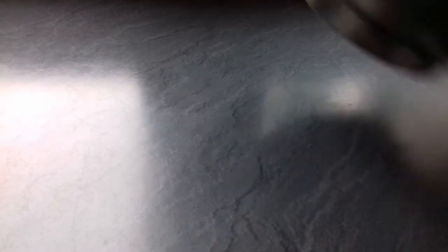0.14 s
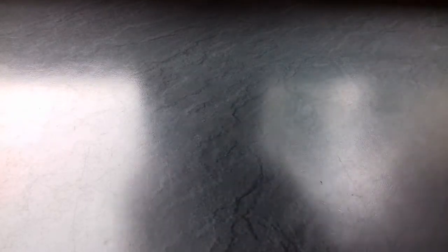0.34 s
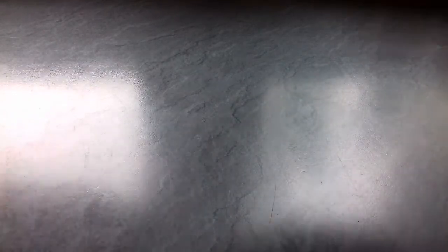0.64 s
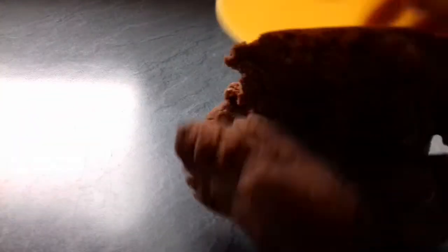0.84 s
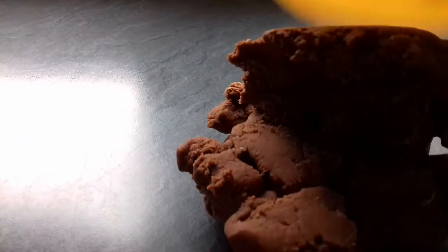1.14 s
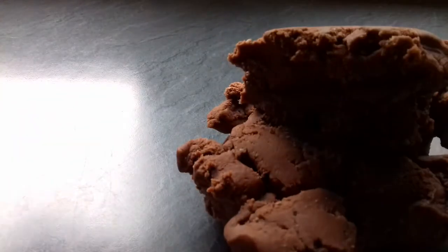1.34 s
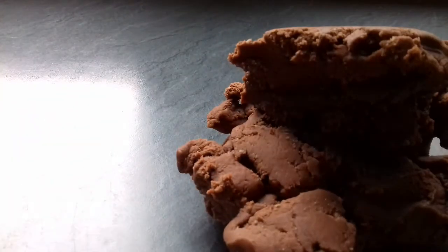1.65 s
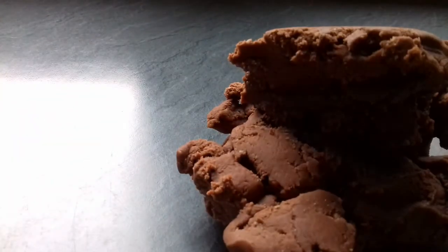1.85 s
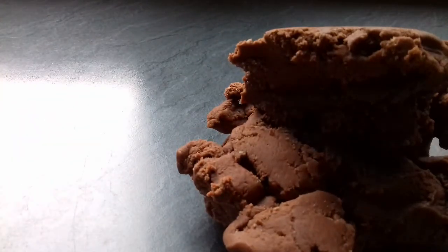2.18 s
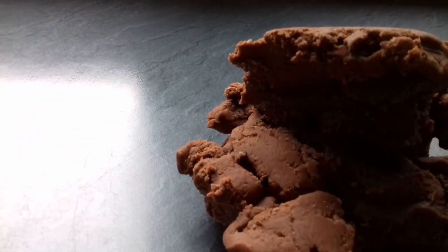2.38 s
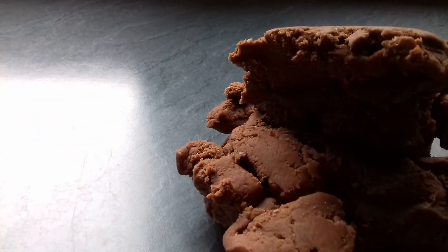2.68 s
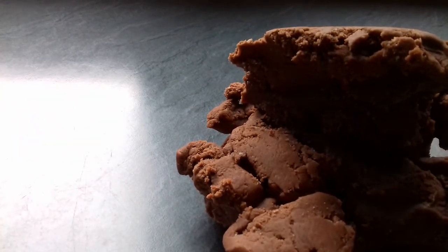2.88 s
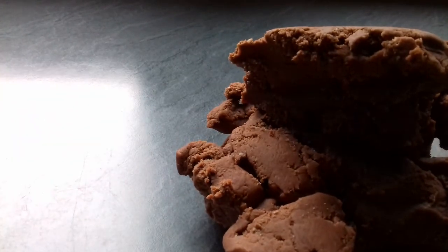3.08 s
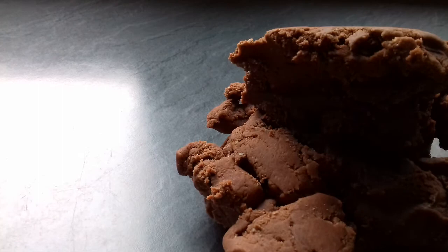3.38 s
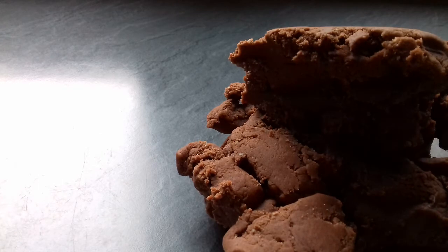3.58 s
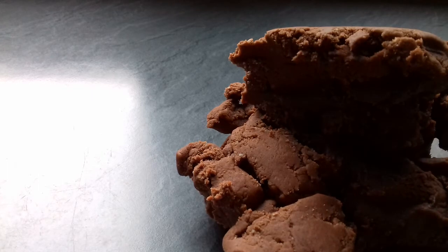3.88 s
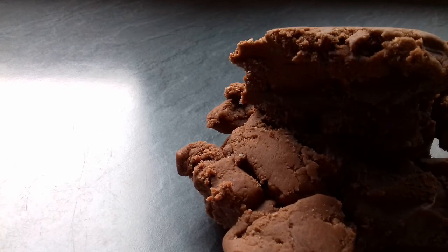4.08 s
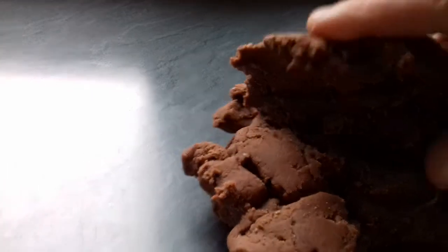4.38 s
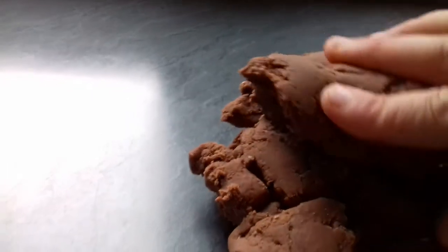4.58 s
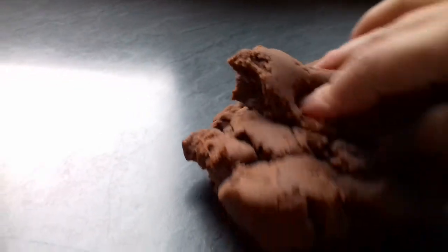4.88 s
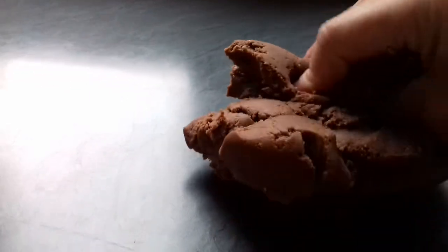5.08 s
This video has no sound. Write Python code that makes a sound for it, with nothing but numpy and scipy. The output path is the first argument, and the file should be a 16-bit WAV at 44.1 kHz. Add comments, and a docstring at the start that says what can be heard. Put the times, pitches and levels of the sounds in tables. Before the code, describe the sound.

Close, slightly thin pickup over a stone countertop in a lively kitchen: a heavy bowl slam at once, a dull dough plop, a cluster of ringing steel clanks with brief scrapes, a pause, the bowl set down with a hollow knock and two weaker bounces, faint dough handling, and one soft low bump. Room echo about half a second, quiet hiss beneath.

```python
"""In a small kitchen, a steel mixer bowl is knocked out over a stone countertop.
The dough drops with a soft plop, the bowl clanks and rubs as it is handled, is set down with two bounces,
and a last dull bump follows. Blows are clicks with chatter, damped thuds and ringing steel modes; rubs are
grainy noise. The room answers each blow with scattered echoes, over a faint steady hum and hiss."""
import sys
import numpy as np
from scipy import signal
from scipy.fft import rfft, irfft, next_fast_len
from scipy.io import wavfile
from scipy.ndimage import uniform_filter1d

SR = 44100
rng = np.random.default_rng(int(sys.argv[2]) if len(sys.argv) > 2 else 0)


def generate_wav(signal):
    """Clip the signal to [-1, 1] and save it as 16-bit WAV at the path in sys.argv[1]."""
    frames = np.transpose(np.atleast_2d(signal))
    scaled = np.clip(frames, -1, 1) * 32767
    pcm = np.round(scaled).astype(np.int16)
    wavfile.write(sys.argv[1], SR, pcm)


N = 230836  # length of the scene in samples

# Room air, only its colour: pitch_hz, relative_level_db
AIR_COLOUR = [(25, -7.5), (55, -16.5), (100, -7.5), (160, -6.5), (300, -5), (600, -11), (900, -15),
              (2000, -18), (3900, -17.5), (5200, -45.5), (9000, -43.5), (15000, -46.5)]
# Humming resonances in the background: pitch_hz, width_hz, rms_level_db
HUM_RESONANCES = [(319.3, 7.5, -75), (408, 10, -77.5), (565, 10, -80)]
# Hiss of each channel, only its colour: pitch_hz, relative_level_db
HISS_COLOUR = [(25, 19), (120, 12.5), (300, 9.5), (700, 17.5), (5000, 3), (9300, -1), (10000, -12.5),
               (10800, 0), (14400, 0.5), (15100, -8.5), (15600, -1)]
AIR_DB, HISS_DB = -65.5, -69  # rms levels

# Colour of the kitchen's dense echo: pitch_hz, relative_level_db
ROOM_COLOUR = [(60, -8.5), (200, 2.5), (470, 1), (1000, -2), (2000, 3), (4500, -1.5), (9000, 5.5)]
# Time the dense echo takes to fall 60 dB: pitch_hz, t60_s
ROOM_DECAY = [(100, .45), (300, 0.4), (700, 0.49), (1800, 0.54), (4800, 0.59), (10000, .5)]
# First echoes off the nearest walls and cupboards: delay_s, level_db
WALL_ECHOES = [(0.019, -17.5), (.034, -11.5), (0.07, -17.5)]

# Rubs: middle_s, material, spread_s, peak_envelope_level_db
RUBS = [ (0.015, "steel", 0.023, -60), (0.255, "steel", .023, -58), (0.763, "dough", 0.0021, -48.5),
        (0.824, "dough", 0.025, -54.5), (1.36, "steel", 0.02, -74), (1.625, "steel", .03, -55),
        (2.216, "steel", .046, -62), (2.34, "steel", .017, -58.5), (2.53, "steel", .098, -69.5),
        (3.525, "dough", 0.032, -62.5), (4.098, "dough", 0.055, -69), (4.445, "dough", .05, -55.5),
        (4.80, "dough", .03, -68.5), ]
# Broad resonance of each rubbing material: material: centre_hz, width_hz, top_hz
FRICTION = {"steel": (4460, 450, 5050), "dough": (2830, 4400, 4160)}

# Lumps of dough landing, the smaller with a higher thud: start_s, level_db, thud_hz, thud_level_db
LUMPS = [(0.7827, -1, 99.5, -30.5), (1.1482, -13.5, 309, -41)]
LUMP_TILT_DB_PER_OCTAVE, LUMP_CHATTER_DB = 1, -1
LUMP_THUD_CYCLES = 14.7  # swings until the thud has fallen 60 dB
# The dough snaps free just before it falls
SNAP_S, SNAP_DB, SNAP_TILT_DB_PER_OCTAVE, SNAP_CHATTER_DB = 0.7647, 0, -1.7, -6.5

# Colour of each kind of contact: contact: list of pitch_hz, relative_level_db
CONTACT_COLOURS = { "slam": [(50, -13.5), (95, 22.5), (150, 22), (420, 26.5), (520, 13.5), (880, 6),
                   (1080, 12.5), (1300, 1), (2400, -8), (3500, 3), (4700, 5.5), (5900, -12.5),
                   (8000, -13.5), (10000, -33.5)], "clank": [(60, -20), (200, 0), (600, -7.5), (850, 7),
                   (1150, 19.5), (1650, 5.5), (2400, -6.5), (3700, -1.5), (5000, -19.5), (8000, -32.5),
                   (10500, -39.5)], "base": [(45, -6.5), (140, 17.5), (230, 14), (430, 23.5), (700, 19.5),
                   (1200, 5.5), (1900, 0), (2700, -4.5), (4000, -2.5), (5500, -23), (8000, -36.5),
                   (12000, -38.5)], "tap": [(70, -17.5), (200, -10.5), (450, 2), (700, -19.5), (1100, -2.5),
                   (2500, -16.5), (4300, -10), (5400, -27), (7400, -26), (10000, -51)],
                   "dough": [(40, -17.5), (95, 10.5), (200, 9.5), (400, 1.5), (800, -16.5), (1300, -8),
                   (2200, -23), (4200, -21.5), (6000, -48.5)], "crack": [(80, -28), (350, -9.5),
                   (900, -7.5), (1600, 0), (3400, -5), (5000, -30.5), (9000, -49)], "bump": [(45, -27.5),
                   (88, 2.5), (210, -4), (450, 3.5), (900, -3.5), (1600, -13.5), (3800, -19.5), (5200, -41),
                   (9000, -77)], }
# What all contacts of one kind share: contact: chatter_t60_s, sent_to_room_db
CONTACT_FEEL = { "slam": (0.056, -7.5), "clank": (0.065, -2), "base": (.055, -4), "tap": (0.06, -3),
                "bump": (.5, -.5), "dough": (.05, -5), "crack": (0.037, -15), }
# Blows on the bowl: start_s, contact, level_db, tilt_db_per_octave, chatter_db, bowl_ring_db
BLOWS = [ (0.001, "tap", -26, 8.5, 4, -8), (0.0473, "slam", -.5, -.3, 4.5, -1.5),
         (0.0567, "slam", -10, 0.3, 3.5, -16), (0.149, "tap", -10, 3, 8.5, -47),
         (1.5378, "crack", -3, -5.5, 1, -36), (1.6540, "clank", 3, -1.3, -5, -.5),
         (1.756, "tap", -10, 0.5, 8, -12), (1.8737, "tap", 1.5, 0, 4, -5.5),
         (1.9534, "tap", -3, -0.5, 1, -16), (2.0012, "tap", -2, 0.7, 10, -2),
         (3.0990, "base", -1.5, -.1, -1, -.5), (3.1792, "base", -13.5, 0.4, 6.5, -22),
         (3.2903, "base", -14.5, -1.2, -9, -46), (4.3746, "bump", 0, -.6, 5, -50), ]
# Thud of bowl and counter, relative to the blow: contact: list of pitch_hz, t60_s, relative_level_db
THUDS = { "slam": [(133, 0.086, -21), (217.8, .06, -9), (305, .07, -17)], "clank": [(1150, .0038, -24)],
         "base": [(163, .09, -24), (492, 0.042, 0)], "tap": [(460, 0.11, -39)], "crack": [(336, .1, -45)],
         "bump": [(88, .3, -45), (450, .05, -41)], }
# Where each contact meets the bowl: contact: place (0 wall, 1 rim, 2 foot, 3 side)
STRUCK_AT = {"slam": 0, "clank": 1, "base": 2, "tap": 3, "crack": 0, "bump": 2}
# The bowl's modes, strong or weak by the place struck:
# pitch_hz: t60_s, wall_level_db, rim_level_db, foot_level_db, side_level_db
BOWL_MODES = { 586: (0.6, -30, -47, -41.5, -62), 684: (.5, -54, -60.5, -35.5, -65),
              775: (0.64, -51, -57, -41, -61.5), 993: (0.8, -58.5, -32, -49.5, -52),
              1033: (.8, -43, -41, -46, -48), 1040: (.35, -44, -44, -52, -54),
              1065: (1.13, -57.5, -47.5, -52, -48), 1116: (.24, -60, -45, -58, -44),
              1280: (0.93, -67, -37.5, -55, -59), 1543: (0.33, -52, -31.5, -61.5, -54),
              1637: (0.8, -60, -29, -56.5, -65), 1705: (0.0245, -56.5, -48, -21, -58),
              1816: (.35, -66, -58, -31, -68), 1849: (0.33, -59, -50.5, -35.5, -63),
              2203: (.26, -66, -66, -31, -64), 2290: (.08, -58, -56, -33, -56),
              2735: (.12, -33, -58, -50, -62), 2800: (.4, -52, -62, -49, -66),
              3131: (.42, -36, -54, -43, -56), 3344: (.9, -56, -51, -50, -48),
              3359: (.26, -31, -46, -46, -53), 3418: (.13, -23, -50, -56, -62),
              3596: (.09, -22, -46, -56, -62), 3735: (0.02, -31, -52, -54, -63),
              3955: (.36, -49, -57, -42, -64), 4204: (.22, -54, -66, -53, -62),
              4340: (0.4, -50, -66.5, -62, -49.5), 4425: (.42, -42.5, -71, -63, -58),
              4510: (.13, -45, -66, -48, -54), 4657: (0.37, -46, -68.5, -57.5, -65),
              5120: (.08, -37, -74, -57, -70), 5782: (0.5, -67, -54, -76.5, -73), }
STIFFEN_OCT_PER_DB = .01  # a harder blow meets a stiffer contact and thuds higher
THUD_ROOM_DB = -10  # share of each bowl thud that reaches the room
WAVER_DB, WAVER_PER_S = 2.5, 11  # the bowl turns in the hand, so each mode swells and fades on its own

CHATTER_CLUMP_DB, ECHO_CLUMP_DB = 2, 1  # unevenness of the random arrivals
CUTOFF_HZ = 15720
SIZE = 8192  # samples in one touch or thud
AGE = np.arange(SIZE) / SR  # seconds
ECHO_AGE = np.arange(32768) / SR  # seconds


def from_db(db):
    """Turn decibels into a gain."""
    return 10 ** (np.asarray(db) / 20)


def rms_one(x):
    """Scale to an rms (average strength) of 1."""
    return x / np.sqrt(np.mean(x ** 2) + 1e-20)


def bins(size):
    """Frequencies of a spectrum in Hz, none below 1."""
    return np.maximum(np.arange(size // 2 + 1) * SR / size, 1)


def at_hz(points, hz):
    """Read a table between its points, with pitch spaced by octaves."""
    table_hz, value = np.transpose(points)
    return np.interp(np.log(hz), np.log(table_hz), value)


def add(track, sound, start_s):
    """Mix a sound into a track from a given time."""
    start = max(round(start_s * SR), 0)
    track[start:start + len(sound)] += sound[:N - start]


def dying(t60):
    """Fading envelope that falls 60 dB in t60 seconds."""
    return np.exp(-np.log(1000) * AGE / t60)


def causal(db):
    """Minimum-phase response with these levels: nothing sounds before the touch."""
    cepstrum = irfft(np.log(from_db(db)))
    cepstrum[1:SIZE // 2] *= 2
    cepstrum[SIZE // 2 + 1:] = 0
    return np.exp(rfft(cepstrum))


def noise(gain_at):
    """Steady noise of rms 1, coloured by a gain that depends on frequency."""
    size = next_fast_len(N + N % 2, True)
    spectrum = rfft(rng.standard_normal(size)) * gain_at(bins(size))
    return rms_one(irfft(spectrum, size)[:N])


def resonance(f, hz, width_hz):
    """Gain of one resonance, 1 at its peak."""
    return 1 / np.sqrt(1 + ((f * f - hz * hz) / (f * width_hz)) ** 2)


def scatter(envelope, smooth_hz, clump_db):
    """Random arrivals in small clumps under an envelope, evened to unit power over broad bands."""
    size = len(envelope)
    slow_noise = uniform_filter1d(rng.standard_normal(size), size=150)
    clumps = from_db(clump_db * rms_one(slow_noise))
    arrivals = rng.standard_normal(size) * clumps * envelope
    spectrum = rfft(arrivals, 2 * size)
    smooth_bins = max(int(2 * smooth_hz * size / SR), 1)
    power = uniform_filter1d(np.abs(spectrum) ** 2, smooth_bins)
    return irfft(spectrum / np.sqrt(power))[:size]


def background():
    """Room air with a faint hum, both the same in each channel, and each channel's own hiss."""
    air = from_db(AIR_DB) * noise(lambda f: from_db(at_hz(AIR_COLOUR, f)))
    hum = 0
    for hz, width_hz, db in HUM_RESONANCES:
        hum = hum + from_db(db) * noise(lambda f: resonance(f, hz, width_hz) ** 2)
    hiss = np.array([noise(lambda f: from_db(at_hz(HISS_COLOUR, f))) for channel in range(2)])
    return air + hum + from_db(HISS_DB) * hiss


def kitchen(gap_s=0.0092, diffuse_db=-1.5):
    """Response of the room from one spot: a few wall echoes, and a dense tail that dies band by band."""
    mean_t60 = .5
    build_up = 1 - np.exp(-(ECHO_AGE / gap_s) ** 4)
    envelope = from_db(-60 * ECHO_AGE / mean_t60) * build_up
    size = len(envelope)
    f = bins(2 * size)
    colour = from_db(diffuse_db + at_hz(ROOM_COLOUR, f))
    echoes = rfft(scatter(envelope, 50, ECHO_CLUMP_DB), 2 * size) * colour
    tail = 0
    for hz, t60 in ROOM_DECAY:
        # Overlapping bands, each peaking at its own pitch
        share = at_hz([(other, float(other == hz)) for other, _ in ROOM_DECAY], f)
        band = irfft(echoes * share)[:size]
        # Swap the shared decay for the band's own
        tail = tail + band * np.exp(np.log(1000) * ECHO_AGE * (1 / mean_t60 - 1 / t60))
    for delay_s, db in WALL_ECHOES:
        tail[round(delay_s * SR)] += from_db(db)
    return tail


def rubs(grain_db=3.5):
    """Short strokes of grainy friction, each with one broad resonance."""
    out = np.zeros(N)
    size = len(ECHO_AGE)
    f, middle_s = bins(size), ECHO_AGE.mean()
    for s, material, spread_s, db in RUBS:
        hz, width_hz, top_hz = FRICTION[material]
        slow_noise = uniform_filter1d(rng.standard_normal(size), size=90)
        grains = rms_one(from_db(grain_db * rms_one(slow_noise)))
        colour = resonance(f, hz, width_hz) / np.sqrt(1 + (f / top_hz) ** 20)
        friction = rms_one(irfft(rfft(grains * rng.standard_normal(size)) * colour))
        lead_s = min(s, middle_s)  # a stroke near the start has less room to swell
        stroke = np.exp(-.5 * ((ECHO_AGE - lead_s) / spread_s) ** 2)
        add(out, from_db(db) * stroke * friction, s - lead_s)
    return out


def force_db(db, tilt, hz):
    """Level of a blow at a frequency: a sharp one favours the treble, a soft one the bass."""
    return db + tilt * np.log2(np.maximum(hz, 100) / 1000)


def touch(contact, db, tilt, chatter_db):
    """A click and its brief chatter; the room is fed by the energy of both. Gives (direct, sent to room)."""
    chatter_t60, room_db = CONTACT_FEEL[contact]
    f = bins(SIZE)
    click = irfft(causal(force_db(db, tilt, f) + at_hz(CONTACT_COLOURS[contact], f)))
    arrivals = scatter(dying(chatter_t60), 300, CHATTER_CLUMP_DB)
    chatter = signal.fftconvolve(click, arrivals)[:SIZE]
    chatter_gain = from_db(chatter_db)
    direct = click + chatter_gain * chatter
    sent = from_db(room_db) * np.hypot(1, chatter_gain) * click
    return direct, sent


def thud(hz, t60, rise_s=0.0018):
    """A damped swing that builds up softly, then dies away."""
    build_up = 1 - np.exp(-AGE / rise_s)
    swing = dying(t60) * build_up * np.sin(2 * np.pi * hz * AGE)
    return signal.sosfilt(signal.butter(1, [hz / 2, hz * 2], "band", fs=SR, output="sos"), swing)


def dough(thud_room_db=-12):
    """The dough snaps free of the bowl and plops onto the counter; a crumb follows."""
    direct, to_room = np.zeros(N), np.zeros(N)
    near, sent = touch("crack", SNAP_DB, SNAP_TILT_DB_PER_OCTAVE, SNAP_CHATTER_DB)
    add(direct, near, SNAP_S)
    add(to_room, sent, SNAP_S)
    for s, db, thud_hz, thud_db in LUMPS:
        near, sent = touch("dough", db, LUMP_TILT_DB_PER_OCTAVE, LUMP_CHATTER_DB)
        body = from_db(thud_db) * thud(thud_hz, LUMP_THUD_CYCLES / thud_hz)
        add(direct, near + body, s)
        add(to_room, sent + from_db(thud_room_db) * body, s)
    return direct + signal.oaconvolve(to_room, kitchen())[:N]


def waver():
    """A slow random swell and fade, as a gain."""
    steps = np.arange(N) * WAVER_PER_S / SR
    return np.interp(steps, np.arange(256), from_db(WAVER_DB * rng.standard_normal(size=256)))


def bowl_ring(place, low_hz=450, top_hz=6500):
    """The steel's modes under all the blows at one place; neighbouring modes swing in opposite senses."""
    strikes = np.full(N, 1e-18)  # a tiny constant in place of silence
    for s, contact, *_, ring_db in BLOWS:
        if STRUCK_AT[contact] == place:
            strikes[max(round(s * SR), 0)] += from_db(ring_db)
    out = 0
    for k, (hz, (t60, *place_db)) in enumerate(BOWL_MODES.items()):
        # A two-step feedback filter rings at hz and loses 60 dB in t60
        decay = np.exp(-np.log(1000) / (t60 * SR))
        turn = 2 * np.pi * hz / SR
        strength = (-1) ** k * from_db(place_db[place]) * np.sin(turn)
        feedback = [1, -2 * decay * np.cos(turn), decay * decay]
        mode = signal.lfilter([0, strength], feedback, strikes)
        out = out + waver() * mode
    return signal.sosfilt(signal.butter(2, [low_hz, top_hz], "band", fs=SR, output="sos"), out)


def blows(ring_room_db=-8):
    """Each blow is a touch, a thud that follows its force, and the bowl's ring; each place has its own echo."""
    direct = np.zeros(N)
    to_room = {place: np.zeros(N) for place in sorted(set(STRUCK_AT.values()))}
    for s, contact, db, tilt, chatter_db, _ in BLOWS:
        near, sent = touch(contact, db, tilt, chatter_db)
        stiffer = 2 ** (STIFFEN_OCT_PER_DB * db)
        body = 0
        for hz, t60, thud_db in THUDS[contact]:
            body = body + from_db(force_db(db, tilt, hz) + thud_db) * thud(hz * stiffer, t60)
        add(direct, near + body, s)
        add(to_room[STRUCK_AT[contact]], sent + from_db(THUD_ROOM_DB) * body, s)
    for place, sent in to_room.items():
        ring = bowl_ring(place)
        echo = signal.oaconvolve(sent + from_db(ring_room_db) * ring, kitchen())[:N]
        direct += ring + echo
    return direct


def scene(top_hz=8800):
    """The handling loses its highest treble above about 9 kHz, while the background keeps it; all handling
    reaches both channels alike."""
    handling = blows() + dough() + rubs()
    softened = signal.sosfilt(signal.butter(2, top_hz, fs=SR, output="sos"), handling)
    return softened + background()


def record(dry, low_cut_hz=68):
    """The small microphone loses the bass; the top is cut steeply."""
    thin = signal.sosfilt(signal.butter(2, low_cut_hz, "high", fs=SR, output="sos"), dry)
    return signal.sosfilt(signal.ellip(12, .1, 80, CUTOFF_HZ, fs=SR, output="sos"), thin)


dry = scene()
out = record(dry)
generate_wav(out)
```